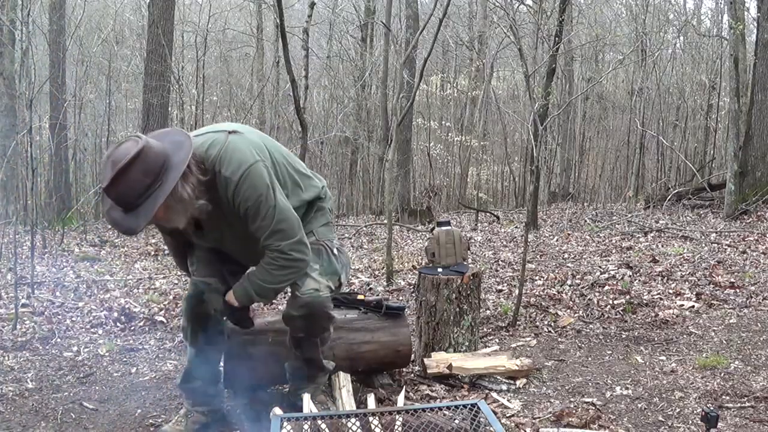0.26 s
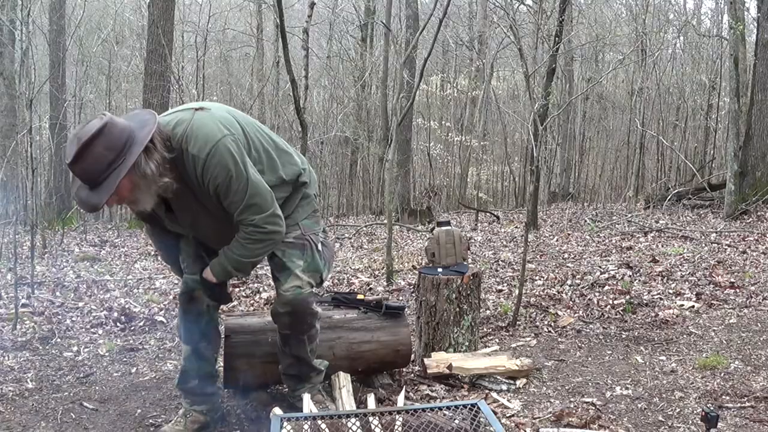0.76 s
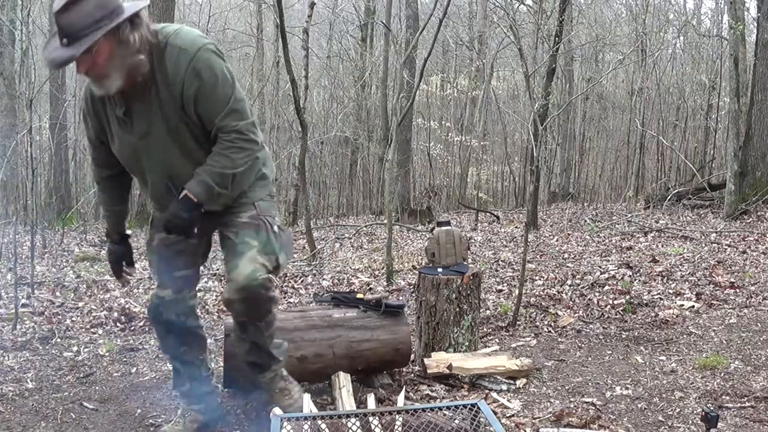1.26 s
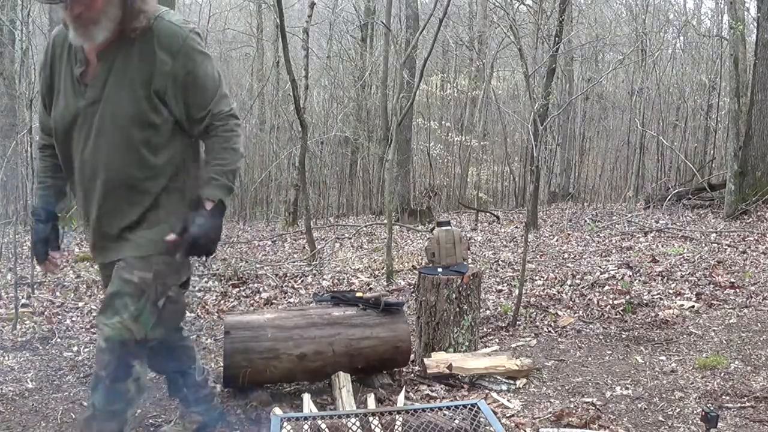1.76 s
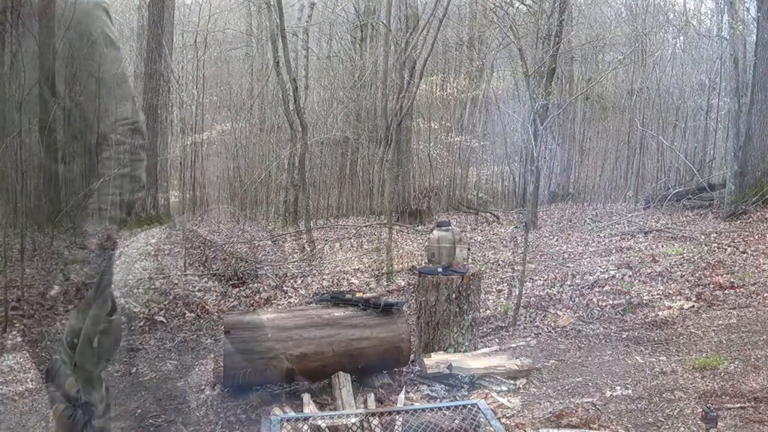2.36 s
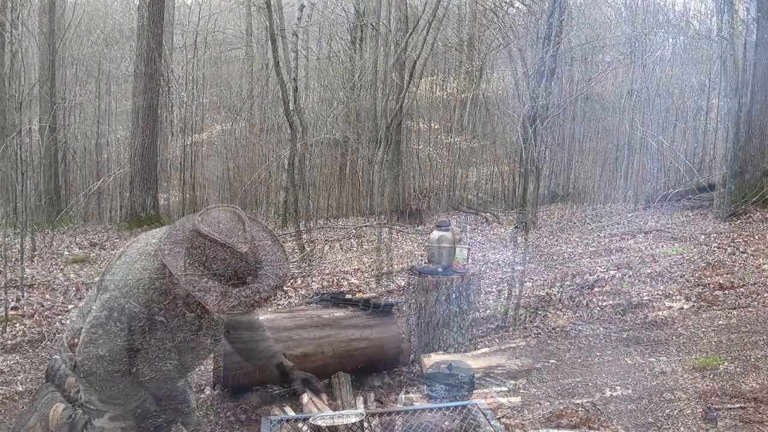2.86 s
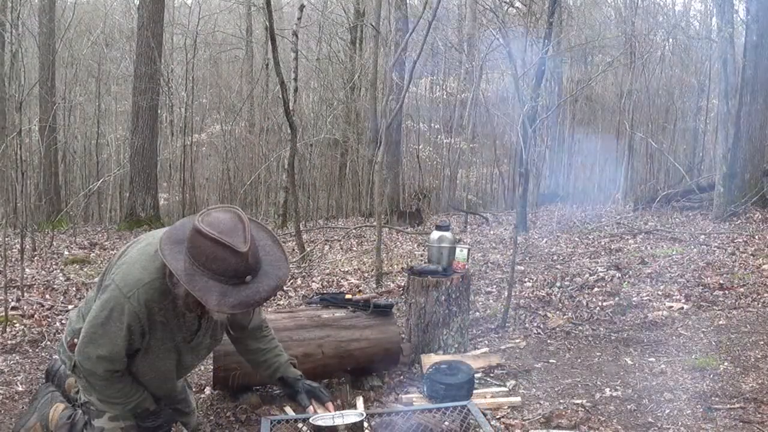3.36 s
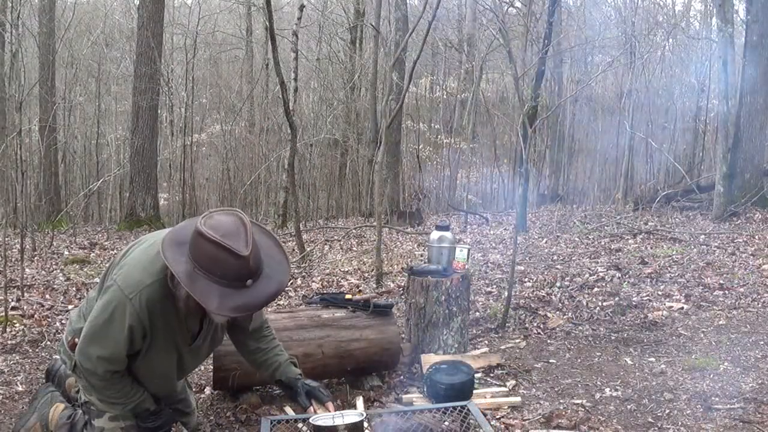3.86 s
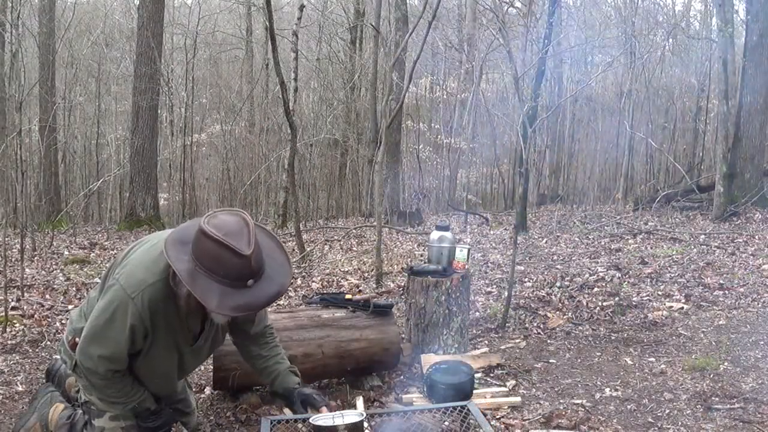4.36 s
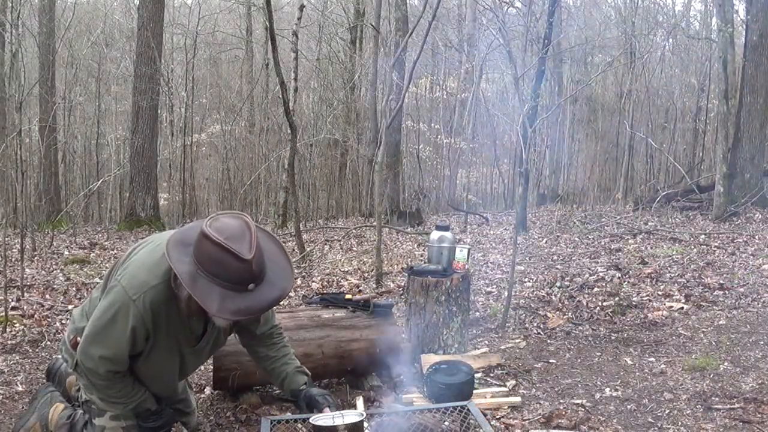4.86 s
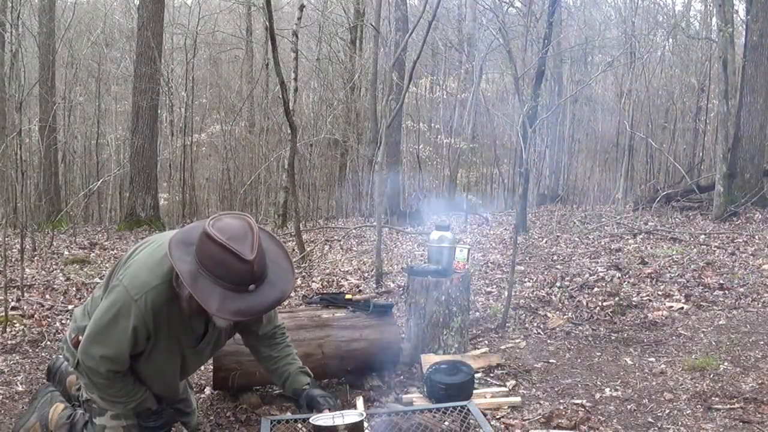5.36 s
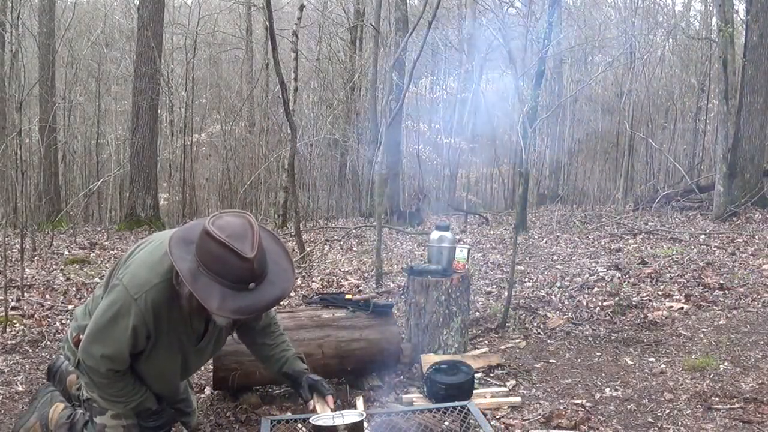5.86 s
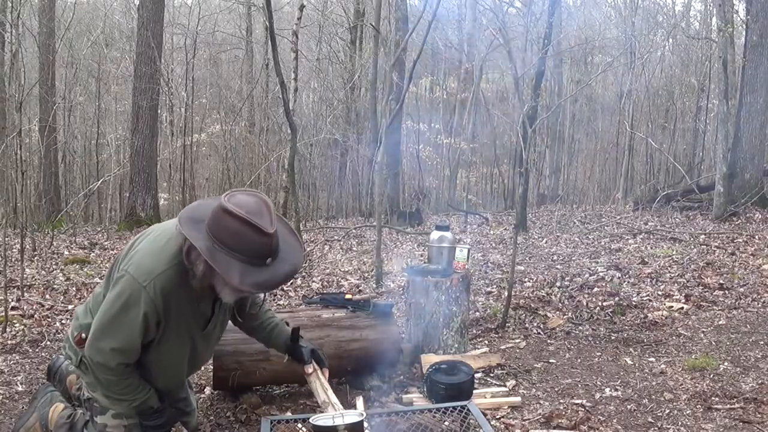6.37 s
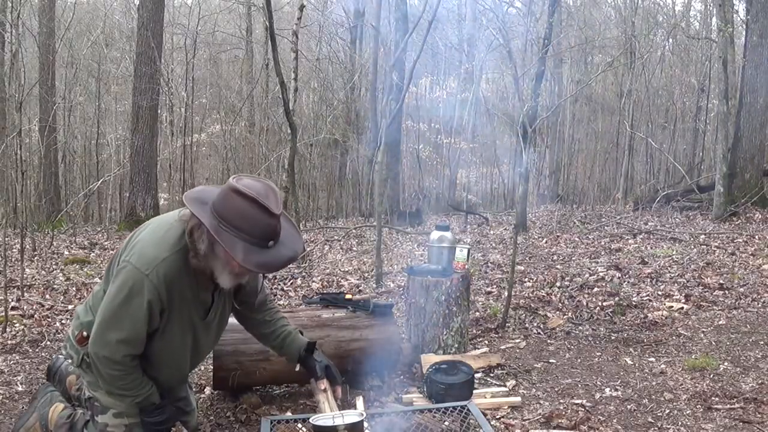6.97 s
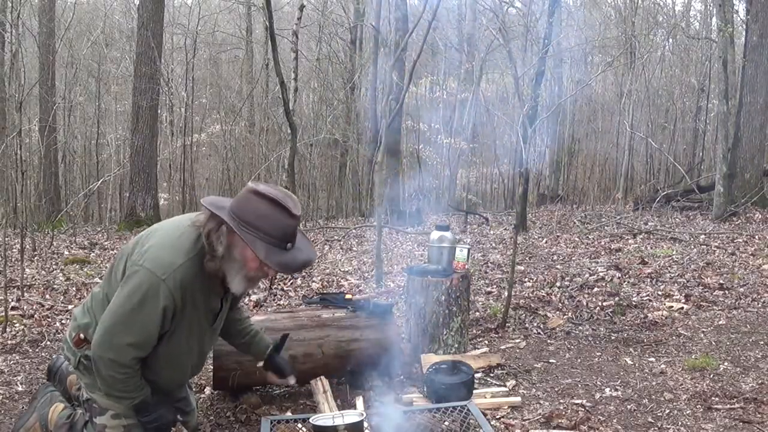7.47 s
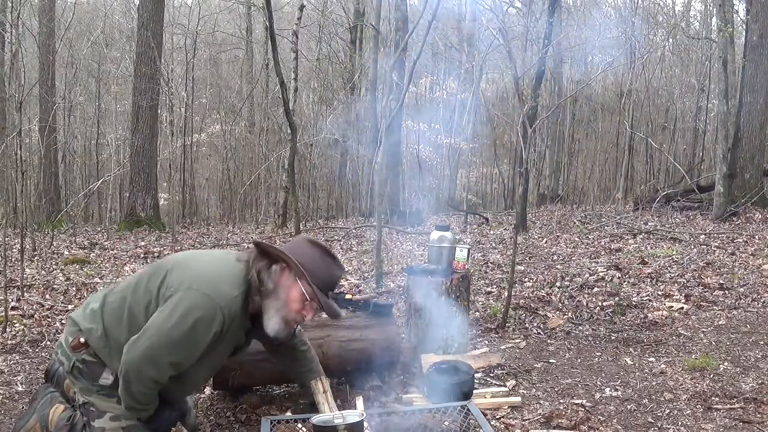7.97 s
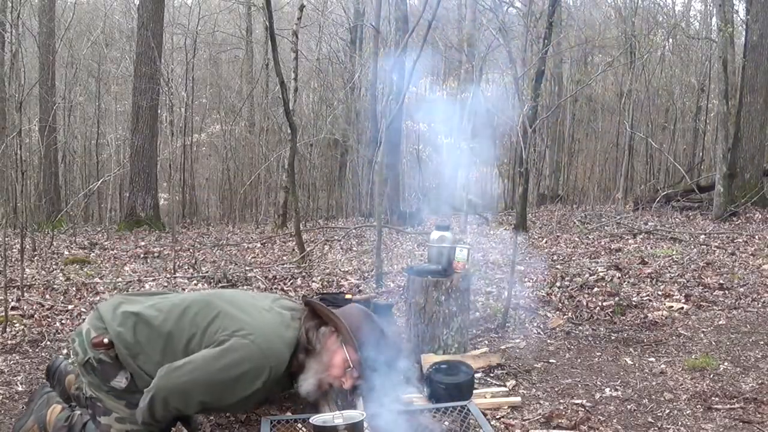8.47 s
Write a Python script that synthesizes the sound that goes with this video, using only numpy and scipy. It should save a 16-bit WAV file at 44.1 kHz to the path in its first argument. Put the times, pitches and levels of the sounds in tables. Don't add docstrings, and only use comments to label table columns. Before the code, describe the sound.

Quiet woods with faint boot rustles, then a wet wood fire sizzling steadily, snapping and bursting loudly, thin steam whistles and a far bird call.

```python
import sys
import numpy as np
from scipy import signal
from scipy.io import wavfile
from scipy.ndimage import uniform_filter1d

SR = 44100
rng = np.random.default_rng(int(sys.argv[2]) if len(sys.argv) > 2 else 0)


def digitize_waveform(pressure):
    field = np.atleast_2d(pressure).T
    bounded = np.clip(field, -1, 1)
    quanta = np.round(bounded * 32767).astype(np.int16)
    wavfile.write(sys.argv[1], SR, quanta)


def field_ratio(decibels):
    return 10 ** (np.asarray(decibels, dtype=float) / 20)


N = 384111
TIME = np.arange(N) / SR

# start_s, level_db
FIRE = [(0.0, -64), (0.99, -64), (1.19, -61), (1.7, -62), (2.15, -59), (2.5, -59), (2.62, -56.5),
        (3.69, -52), (4.56, -50.5), (4.73, -52.5), (5.58, -51.5), (7.42, -51), (8.27, -52), (8.71, -51)]
FULL_DB = -51.5
# pitch_hz, level_db (per Hz)
STEAM = [(710, -41), (1200, -12), (1340, -9.5), (2240, -5.5), (2550, -7.5), (2740, -8), (2990, -6.5),
         (5520, -4.5), (7300, -5), (9550, -1.5), (11700, -4), (13200, -6.5), (15600, -20)]
# pitch_hz, width_hz, level_db
STEAM_PEAKS = [(4950, 130, 4.5), (5500, 130, 5.5), (6600, 210, 2), (8960, 170, 2), (9710, 590, 4.5),
               (11500, 600, 3.0), (12150, 330, -6), (12550, 160, -3)]


def steam():
    s, level_db = np.transpose(FIRE)
    tilt_db = -1.63 + 0.35 * (level_db - FULL_DB)
    hiss = air(STEAM, patchy_db=1.5, flicker_db=0.5, size=512, tilt=(s, tilt_db), peaks=STEAM_PEAKS)
    spits_per_s = 500
    spits = field_ratio(3.6 * np.minimum(rng.exponential(1, N), 4)) * (rng.random(N) < spits_per_s / SR)
    sizzle = evened(resonate(spits, 9100, 2800) + 1.2 * resonate(spits, 5600, 1500))
    song = jet_song(9400, wander_hz=300, width=350)
    return field_ratio(np.interp(TIME, s, level_db)) * (hiss + field_ratio(-10.5) * sizzle + field_ratio(-10.5) * song)


def jet_song(hz, wander_hz, width):
    noise, drift, flutter = rng.standard_normal((3, N))
    sung = resonate(noise, hz + wander_hz * evened(uniform_filter1d(drift, size=1500)), width)
    return evened(sung * field_ratio(4.6 * evened(uniform_filter1d(flutter, size=700))))


# pitch_hz, level_db (per Hz)
FLAME = [(15, -50), (25, -19), (102, -2.5), (262, -1.5), (589, -5), (687, -1), (1320, -6), (2230, -9),
         (2500, -11), (3250, -43), (5500, -120)]


def flames():
    lag_s, share, full_db = 0.6, 0.53, -60.5
    steam_db = np.interp(TIME - lag_s, *np.transpose(FIRE))
    level_db = full_db + share * (steam_db - FULL_DB)
    return field_ratio(level_db) * air(FLAME, patchy_db=0.8, flicker_db=0.24, size=2048)


# start_s, peak_db, ring_db, low_db, left_right_db
CRACKS = [(0.3187, -34.5, -4.5, -44, 0.0), (1.3803, -35, -19, -32, 12), (2.0043, -27, -8, -33, 8),
          (2.574, -39, -10, -29, 12), (3.2144, -32, -6, -19, .5), (3.437, -26, -6, -32, 0.0),
          (3.9005, -27.5, -5, -30, 0.0), (4.0258, 2, -15, -32, 1.5), (4.0357, -21, -8, -30, 3.5),
          (4.5136, -22, -9.5, -36, 0.0), (4.6713, -31, -2, -25, 2), (5.017, -17, -21, -50, 2),
          (5.4398, -36, -3, -26, 0.0), (5.588, -36, -5, -29, 0.0), (6.2427, -25.5, -7.5, -28, 3),
          (6.6505, -28, -18, -28, 0.5), (6.651, -30, -12, -34, 0.5), (7.337, -31, -10, -36, 11),
          (7.5178, -10, -14, -33, 4), (8.1923, -28, -11, -33, 3)]
# start_s, peak_db
SNAPS = [(1.6335, -41), (2.879, -39), (3.076, -39), (3.245, -37), (3.3238, -33), (3.428, -31),
         (2.9936, -38), (3.9097, -29), (3.5594, -38), (4.0454, -25), (4.556, -31), (4.9377, -36),
         (5.5122, -40), (7.166, -34), (7.5274, -31), (8.024, -30.5), (8.52, -33)]
SNAP_RING_DB, SNAP_LOW_DB, SNAP_PAN_DB = -7.5, -26, 0.6
# start_s, peak_db
DRY_TICKS = [(4.0135, -33), (6.6665, -40), (6.6682, -28), (3.4295, -37), (2.09, -42), (1.196, -41),
             (1.638, -41)]
DRY_RING_DB, DRY_LOW_DB = -18, -38
# pitch_hz, width_hz, level_db
POP_BODY = [(1630, 610, -4.5), (2200, 820, -12), (5420, 680, -8), (9000, 3300, -2.5), (10500, 1400, -14)]


def pops():
    out, t, late = np.zeros((2, N)), TIME[:2500], TIME[:8000]
    rows = CRACKS + [(s, db, SNAP_RING_DB, SNAP_LOW_DB, SNAP_PAN_DB) for s, db in SNAPS]
    rows = rows + [(s, db, DRY_RING_DB, DRY_LOW_DB, SNAP_PAN_DB) for s, db in DRY_TICKS]
    for s, db, ring_db, low_db, pan_db in rows:
        noise, *scatter = rng.standard_normal((3, len(late)))
        u = (t - 0.0013) * 21000 * field_ratio(-0.15 * (low_db + 26))
        push = np.exp(-u ** 2)
        crack = (1 - 2 * u ** 2) * push
        crack = crack + 1.2 * resonate(crack, 8600, 2200) + 4.3 * resonate(crack, 2000, 1200)
        crack = field_ratio(db - 0.5) * crack / crack.max()

        flight_s = 0.0092 + 0.00008 * db
        fall = field_ratio(-60 * (t / flight_s) ** 3) + field_ratio(-10 - 60 * t / 0.045)
        splinters = noise[:len(t)] * fall * (t > 0.0019)
        ring = sum(field_ratio(b) * resonate(splinters, f, w) * np.sqrt(2000 / w) for f, w, b in POP_BODY)
        ring = field_ratio(db + ring_db - 1.2) * ring

        add(out, s, band(crack + ring, 3390, 16500), 0.26 * pan_db)
        low = band(field_ratio(2.5) * crack + field_ratio(-4.5) * ring, 600, 3320) + field_ratio(db - 5) * band(push, 900, 2300)
        low = field_ratio(low_db + 22.5) * low
        add(out, s, low, pan_db)
        add(out, s + 0.0026, field_ratio(-4) * band(low, 500, 2200), pan_db)
        trees = split(np.array(scatter), 6600, 5.1) * field_ratio(db - 41 - 60 * late / 0.22) * (late > 0.004)
        add(out, s, trees.T, 0)
    return out


LOG_SPLIT, STICK_SPLIT = (4.0273, -6), (7.5192, -14)  # start_s, level_db
# start_s, level_db
KNOT_SPLITS = [
    (6.6517, -32),
    (6.6536, -34),
]
# pitch_hz, level_db, t60_s
BIG_LOG = [(1520, -10, .013), (1900, -19, .012), (2450, -13, .012), (3470, -20, .02), (4390, -17, .012),
           (5100, -9, .015), (5400, -17, .016), (6170, -14, .018), (7450, -15, .016), (8330, -13, .018),
           (8850, -20, .02), (9700, -12, .02), (10500, -20, .03), (11720, -24, .016)]
# pitch_hz, level_db, t60_s
LOG_BUTT = [(160, -46, .09), (500, -38, .05), (750, -31, .04), (980, -31, .02), (2120, -19, .014),
            (13200, -27, .015), (14600, -26, .016), (15500, -27, .014)]
# pitch_hz, level_db, t60_s
THIN_STICK = [(4080, -19, .014), (5420, -15, .012), (6900, -19, .012), (8450, -9, .006), (10000, -12, .013),
              (10950, -13, .012), (13530, -16, .013), (15000, -20, .01)]
# pitch_hz, level_db, t60_s
KNOT = [(720, -10, .02), (1250, -6, .01), (1700, -4, .009), (2250, 1, .008)]
# pitch_hz, level_db, t60_s
KNOT_SHELL = [(3100, -6, .007), (4200, -8, .006), (5300, 2, .008), (6500, 1, .007), (8700, 3, .006),
              (11500, -8, .006), (15200, -14, .008)]


def splitting_wood():
    t, out = TIME[:3000], np.zeros((2, N))
    splits = [(LOG_SPLIT, BIG_LOG), (LOG_SPLIT, LOG_BUTT), (STICK_SPLIT, THIN_STICK)]
    splits += [(KNOT_SPLITS[0], KNOT_SHELL)] + [(step, KNOT) for step in KNOT_SPLITS]
    rise = np.minimum(1, t / 0.0004)
    for (s, blow_db), modes in splits:
        ring = 0
        for k, (hz, db, t60) in enumerate(modes):
            ring = ring + (-1) ** k * field_ratio(db - 60 * t / t60) * np.sin(2 * np.pi * hz * t)
        add(out, s, field_ratio(blow_db) * ring * rise, 1.0)
    return out


# start_s, length_s, level_db, low_db
SPURTS = [(1.866, 0.046, -62, -6), (2.149, .06, -57, 0), (2.578, 0.23, -57.5, 7.5), (2.8, .05, -51.5, -17),
          (3.215, 0.075, -52.5, -4), (3.428, 0.012, -43.5, -5), (3.436, 0.16, -50, -4),
          (3.895, 0.028, -44, -2), (4.618, 0.09, -49, -2), (5.422, 0.063, -48.5, -6),
          (5.464, .085, -46.5, -11), (5.559, 0.043, -50, -14), (7.402, 0.11, -59, 10)]


def spurts():
    out = np.zeros((2, N))
    for s, length, db, low_db in SPURTS:
        noise, clumps = rng.standard_normal((2, 14000))
        u = TIME[:14000] / length
        rough = noise * field_ratio(2.7 * evened(uniform_filter1d(clumps, size=150)))
        gush = rough * np.minimum(1, u / 0.1) * np.exp(-u ** 2)
        bright = 1.43 * resonate(gush, 9200, 1900) + 0.56 * resonate(gush, 6200, 1500) + 0.35 * gush
        add(out, s, field_ratio(db) * split(bright, 4300, low_db), 0.3)
    return out


# start_s, pitch_hz, level_db
LONG_WHISTLE = [(0.0, 10190, -70), (0.4, 10170, -72), (0.62, 9910, -73), (1.1, 10020, -71),
                (1.4, 9790, -73), (1.85, 9940, -72), (1.9, 9470, -68), (2.0, 9850, -66), (2.06, 9900, -70)]
# start_s, pitch_hz, level_db
CHOKED_WHISTLE = [(1.894, 3890, -72), (1.922, 3850, -62), (1.988, 3826, -64), (2.004, 3830, -74),
                  (2.016, 3822, -62), (2.058, 3832, -66), (2.1, 3805, -62), (2.114, 3800, -78),
                  (2.132, 3825, -67), (2.2, 3822, -75)]
# start_s, pitch_hz, level_db
STEPPED_WHISTLE = [(6.218, 8550, -64), (6.232, 8800, -57), (6.285, 8860, -57), (6.322, 8750, -58),
                   (6.332, 8560, -58), (6.37, 8640, -59), (6.4, 8780, -57), (6.41, 8780, -66)]
# start_s, length_s, first_hz, last_hz, level_db
CLEAR_WHISTLES = [
    (.4, .5, 7870, 7870, -78),
    (2.21, 0.25, 6020, 5880, -57.5),
]
# length_share, glide_share, level_db
CLEAR_SHAPE = [(0, 0, -8), (.1, .3, -1), (.6, .75, -1), (.68, .95, -9), (1, 1, -14)]
# start_s, length_s, first_hz, last_hz, level_db
HOARSE_WHISTLES = [(4.365, .1, 11600, 11400, -56), (8.08, .12, 7830, 7700, -63),
                   (4.255, .045, 9850, 9250, -58), (4.335, .05, 9800, 9500, -56),
                   (4.383, .06, 8950, 9300, -54)]
# length_share, glide_share, level_db
HOARSE_SHAPE = [(0, 0, -15), (.15, .15, -3), (.7, .7, 1), (1, 1, -14)]


def whistles():
    out = np.zeros((2, N))
    for rows, waver_hz in (LONG_WHISTLE, 14), (CHOKED_WHISTLE, 12), (STEPPED_WHISTLE, 30):
        add(out, rows[0][0], tone(rows, waver_hz), 0.3)
    for row in CLEAR_WHISTLES:
        add(out, *sputter(*glide(row, CLEAR_SHAPE, waver_hz=14), depth_db=1.2), 0.3)
    for row in HOARSE_WHISTLES:
        add(out, *glide(row, HOARSE_SHAPE, waver_hz=89), 0.3)
    return out


def sputter(start, sound, depth_db):
    breaks = evened(uniform_filter1d(rng.standard_normal(len(sound)), size=900))
    return start, sound * field_ratio(depth_db * breaks)


# start_s, peak_db, pitch_hz
EMBERS = [(1.1162, -44, 8000), (1.3816, -41, 7000), (1.4773, -46, 8000), (1.6345, -43, 7000),
          (1.6734, -45, 8000), (2.1145, -44, 9000), (2.215, -47, 9500), (2.415, -45, 9000),
          (2.467, -43, 9000), (2.676, -44, 9500), (2.702, -44, 10000), (5.441, -34, 6500),
          (5.4875, -39, 8500), (5.5135, -35, 10000), (5.5897, -33, 5900), (5.579, -41, 9000),
          (6.6678, -42, 5000)]


def embers():
    t, out = TIME[:400], np.zeros((2, N))
    for s, db, hz in EMBERS:
        middle, upper, lower = [np.sin(2 * np.pi * hz * ratio * t) for ratio in (1, 1.25, 0.75)]
        add(out, s, field_ratio(db - 4 - 60 * t / 0.005) * (middle - upper + lower), 0.5)
    return out


# start_s, peak_db, pitch_hz, left_right_db
KNOCKS = [(1.093, -50, 1510, 4), (1.199, -44, 1820, 5), (1.226, -46, 1730, 6), (1.27, -48, 1650, 7),
          (1.299, -47, 1660, 7), (1.799, -50, 533, 8), (2.22, -46, 2140, 7), (2.221, -50, 3500, 4),
          (2.222, -51, 4800, 3), (2.99, -46, 450, 1.5), (3.213, -48, 848, 1.0), (7.419, -46, 1400, 4),
          (7.472, -43.5, 1590, 1.0), (7.848, -48, 1550, 0.5), (2.222, -45, 580, 0.1),
          (2.558, -42, 360, 1.5), (2.985, -42.5, 990, 2), (2.987, -47, 1550, 2), (1.225, -52, 2330, 5),
          (1.228, -52, 1500, 5), (1.162, -47, 360, 1.5), (1.224, -48, 340, 1.5), (1.258, -49, 320, 1.5)]
# start_s, peak_db, pitch_hz, left_right_db
THUMPS = [
    (4.04, -39, 215, 0.1),
    (6.44, -46, 215, -1),
    (6.78, -55, 230, 0.1),
]


def knocks():
    out, t = np.zeros((2, N)), TIME[:6000]
    for rows, t60 in (KNOCKS, 0.056), (THUMPS, 0.24):
        for s, db, hz, pan_db in rows:
            blow = rng.standard_normal(len(t)) * field_ratio(-60 * t / t60) * np.minimum(1, t / 0.0035)
            body = resonate(blow, hz, 60 + 0.1 * hz) + 0.12 * resonate(blow, hz * 2.54, 390)
            body = body + 0.19 * band(blow, 500, 11200)
            add(out, s, field_ratio(db) * body / abs(body).max(), pan_db)
    return out


# start_s, landing_s (time to full weight), rustle_db, weight_db
STEPS = [
    (1.045, .05, -71, -76),
    (1.15, .11, -63, -63),
    (1.625, .03, -55.5, -80),
    (1.72, .06, -65, -70),
]
# pitch_hz, width_hz
SCUFF_HZ = [(330, 236), (1720, 570), (5000, 4000)]


def scuff():
    start = STEPS[0][0]
    t = start + TIME[:SR]
    clumps = evened(uniform_filter1d(rng.standard_normal(len(t)), size=200))
    grains = rng.standard_normal(len(t)) * field_ratio(3.3 * clumps)
    rustle = weight = 0
    for s, landing, rustle_db, weight_db in STEPS:
        since, after = t - s, np.maximum(t - s - landing, 0)
        rustle = rustle + (t > s) * field_ratio(rustle_db - 680 * abs(since - 0.3 * landing))
        rising = field_ratio(weight_db - 12 * np.clip(1 - since / landing, 0, 1)) * np.clip(since / 0.014, 0, 1)
        weight = weight + rising * (field_ratio(-200 * after) + field_ratio(-11 - 40 * after))
    sound = 0
    for level, (hz, width) in zip((weight, field_ratio(0.5) * weight, rustle), SCUFF_HZ):
        sound = sound + level * evened(resonate(resonate(grains, hz, width), hz, width))
    return start, sound


# start_s, pitch_hz, level_db
SOLE_SQUEAK = [(1.195, 1880, -63), (1.23, 1770, -60), (1.26, 1740, -65), (1.29, 1720, -63),
               (1.4, 1648, -68), (1.52, 1640, -72)]
# start_s, pitch_hz, level_db
HEEL_SQUEAK = [(1.28, 1960, -70), (1.4, 1900, -76), (1.58, 1850, -74), (1.66, 1760, -79), (1.76, 1860, -73),
               (1.85, 1850, -79)]
# start_s, length_s, first_hz, last_hz, level_db
RUBS = [
    (2.946, .016, 2970, 3030, -50),
    (2.962, .015, 3300, 3250, -54),
    (8.49, .058, 1480, 1140, -57),
]
# length_share, glide_share, level_db
RUB_SHAPE = [(0, 0, -10), (.25, .3, 0.5), (.6, .5, -10), (1, 1, -14)]


def squeaks():
    out = np.zeros((2, N))
    for squeak in SOLE_SQUEAK, HEEL_SQUEAK:
        add(out, *sputter(squeak[0][0], tone(squeak, waver_hz=35), depth_db=2.5), 1.5)
    for row in RUBS:
        add(out, *glide(row, RUB_SHAPE, waver_hz=50), 1.5)
    return out


# start_s, length_s, top_hz, last_hz, level_db
HIGH_NOTES = [
    (4.975, .066, 2860, 2660, -52),
    (5.235, .068, 3240, 2740, -45),
    (5.48, .064, 3020, 2720, -46),
]
# length_share, glide_share, level_db
HIGH_SHAPE = [(0, .35, -16), (.15, .25, -11), (.33, 0, -11), (.8, .88, 0), (1, 1, -15)]
# start_s, length_s, top_hz, last_hz,
# level_db
LOW_NOTES = [(5.108, .095, 2460, 2320, -57), (5.355, .1, 2330, 2270, -57), (5.465, .06, 2310, 2280, -63),
             (5.57, .05, 2320, 2290, -65)]
# start_s, length_s, top_hz, last_hz, level_db
LOW_ANSWER = [(6.72, .105, 2360, 2280, -63), (6.972, .1, 2300, 2230, -61), (7.09, .07, 2270, 2240, -65)]
# length_share, glide_share, level_db
LOW_SHAPE = [(0, .4, -7), (.3, 0, -4), (.65, .35, 0), (1, 1, -8)]
# start_s, length_s, top_hz, last_hz, level_db
HIGH_ANSWER = [
    (6.595, .08, 2830, 2660, -56),
    (6.84, .075, 3120, 2770, -53),
    (7.1, .06, 3000, 2780, -56),
]
# length_share, glide_share, level_db
ANSWER_SHAPE = [(0, 0, -16), (.3, .35, -12), (.55, .85, 0), (.8, 1, -4), (1, 1, -12)]
# delay_s, level_db
FAR_TRUNKS = [(.075, -15), (.1, -19)]


def bird():
    dry = np.zeros((2, N))
    phrases = (HIGH_NOTES, HIGH_SHAPE), (LOW_NOTES + LOW_ANSWER, LOW_SHAPE), (HIGH_ANSWER, ANSWER_SHAPE)
    for notes, shape in phrases:
        for note in notes:
            add(dry, *glide(note, shape, waver_hz=20.9), 4)
    t = TIME[:SR // 2]
    trunks = rng.standard_normal((2, len(t))) * field_ratio(-60 * t / 0.5) * (t > 0.012)
    tail = signal.fftconvolve(dry, trunks / np.linalg.norm(trunks[0]), axes=1)[:, :N]
    echoes = sum(field_ratio(db) * np.roll(dry[::-1], round(s * SR), axis=1) for s, db in FAR_TRUNKS)
    return dry + field_ratio(-6.5) * tail + echoes


# start_s, level_db
TICKS = [(0.0, -71), (1.5, -70.5), (2.5, -80), (3.2, -71.5), (4.0, -69.5), (6.5, -69.5), (8.71, -68.5)]


def camcorder():
    frames_per_s, first_tick_s = 30000 / 1001, 0.0035
    turns = (TIME - first_tick_s) * frames_per_s
    ticks = np.diff(np.floor(turns), prepend=-1) * field_ratio(1.2 * rng.standard_normal(N))
    housing = resonate(resonate(ticks, 2746, 160), 2746, 160)
    line_hz = 15733.5 + 2 * np.cos(2 * np.pi * TIME / 9.5)
    throb = 1 + 0.6 * np.cos(2 * np.pi * (13.11 * TIME + 0.155))
    whine = throb * np.sin(2 * np.pi * np.cumsum(line_hz) / SR)
    return field_ratio(np.interp(TIME, *np.transpose(TICKS))) * evened(housing) + field_ratio(-67) * evened(whine)


# pitch_hz, level_db (per Hz)
WOODS = [(18, -52), (30, -31), (71, -6.5), (317, -16), (494, -1), (771, -5.5), (902, -4.5), (2310, -20),
         (2710, -8), (3910, -9), (8800, -9), (9770, -16), (10600, -11), (13700, -12), (15600, -8.5)]


def woods():
    return field_ratio(-60.5) * air(WOODS, patchy_db=0.1, flicker_db=0.4, size=2048)


# pitch_hz, likeness (0 to 1)
SAME = [(25, .75), (60, .99), (120, 0.95), (240, 0.92), (480, 0.26), (950, 0.13), (1890, 0.17),
        (3770, 0.82), (7520, 0.99), (15000, 0.99)]


def air(spectrum, patchy_db, flicker_db, size, tilt=((0, 9), (0, 0)), peaks=()):
    hop = size // 4
    frames, hz = N // hop + 5, np.fft.rfftfreq(size, 1 / SR)
    a, b, c, d, patches = rng.standard_normal((frames, len(hz), 5)).T
    patches = uniform_filter1d(patches, size=size // 100, axis=0)
    patches = evened(uniform_filter1d(patches, size=12288 // size, axis=1))
    flicker = evened(uniform_filter1d(rng.standard_normal(frames), size=4))
    slope = np.log2(hz / 7000 + 0.0035)[:, None] * np.interp(np.arange(frames) * hop / SR, *tilt)
    colour = read(spectrum, hz) + sum(db / (1 + ((hz - f) / w * 2) ** 2) for f, w, db in peaks)
    same = np.clip(read(SAME, hz), -1, 1)[:, None]
    left, other = a + 1j * b, c + 1j * d
    z = np.array([left, same * left + np.sqrt(1 - same ** 2) * other])
    z *= field_ratio(colour[:, None] + patchy_db * patches + flicker_db * flicker + slope)
    return evened(signal.istft(z, nperseg=size, noverlap=size - hop)[1][:, :N])


def read(points, hz):
    f, value = np.transpose(points)
    return np.interp(np.log(hz + 1), np.log(f + 1), value)


def tone(rows, waver_hz):
    s, hz, db = np.transpose(rows)
    t = np.arange(s[0], s[-1], 1 / SR)
    wander = evened(uniform_filter1d(rng.standard_normal(len(t)), size=300))
    turns = np.cumsum(np.interp(t, s, hz) + waver_hz * wander) / SR
    fade = np.minimum(1, np.minimum(t - s[0], s[-1] - t) / 0.004)
    return np.sqrt(2) * field_ratio(np.interp(t, s, db)) * fade * np.sin(2 * np.pi * turns)


def glide(row, shape, waver_hz):
    start, length, first_hz, last_hz, db = row
    share, way, swell_db = np.transpose(shape)
    rows = np.transpose([length * share, first_hz + (last_hz - first_hz) * way, db + swell_db])
    return start, tone(rows, waver_hz)


def resonate(x, hz, width):
    turn = np.exp(2j * np.pi * np.cumsum(hz * np.ones(len(x))) / SR)
    r = np.exp(-np.pi * width / SR)
    return 2 * (turn * signal.lfilter([1 - r], [1, -r], x / turn)).real


def band(x, low_hz, high_hz):
    return signal.sosfiltfilt(signal.butter(2, [low_hz, high_hz], "band", fs=SR, output="sos"), x)


def split(x, hz, low_db):
    return band(x, hz, 14000) + field_ratio(low_db) * band(x, 590, hz)


def evened(x):
    return x / np.sqrt(np.mean(x ** 2) + 1e-20)


def add(mix, s, sound, pan_db):
    part = mix[:, round(s * SR):][:, :len(sound)]
    part += sound[:part.shape[1]].T * field_ratio(np.array([[0.5], [-0.5]]) * pan_db)


def scene():
    fire = steam() + flames() + pops() + splitting_wood() + spurts() + whistles() + embers()
    mix = fire + knocks() + squeaks() + bird() + camcorder() + woods()
    add(mix, *scuff(), 1.0)
    return mix


def top_cut(x):
    return signal.sosfilt(signal.butter(12, 17160, fs=SR, output="sos"), x)


def record(dry):
    no_rumble = signal.sosfilt(signal.butter(3, 50, "high", fs=SR, output="sos"), dry)
    limited = 1.5 * np.tanh(no_rumble / 1.5)
    edge = signal.firwin(1201, 15790, window=("kaiser", 5), fs=SR)
    kept = signal.oaconvolve(limited, edge[None], "same")
    loudness = uniform_filter1d(abs(limited).mean(0), size=88)
    leak = field_ratio(-33) + np.clip(12 * (loudness - 0.006), 0, 0.35)
    top = leak * band(limited - kept, 15000, 16700)
    return top_cut(0.96 * np.clip(kept + top, -1, 1))


dry = scene()
out = record(dry)
digitize_waveform(out)
```